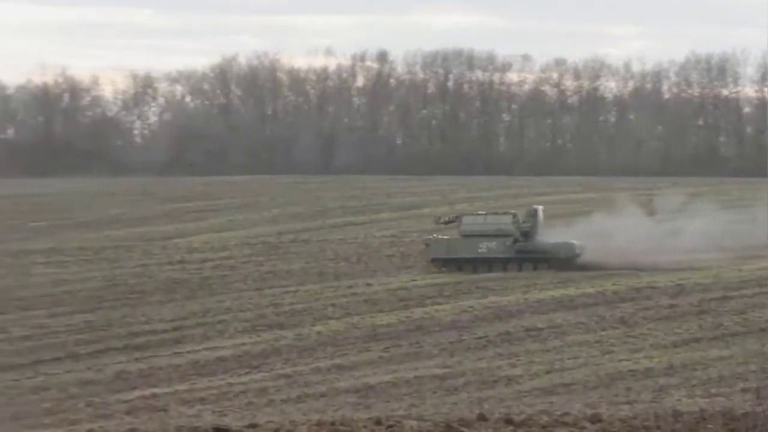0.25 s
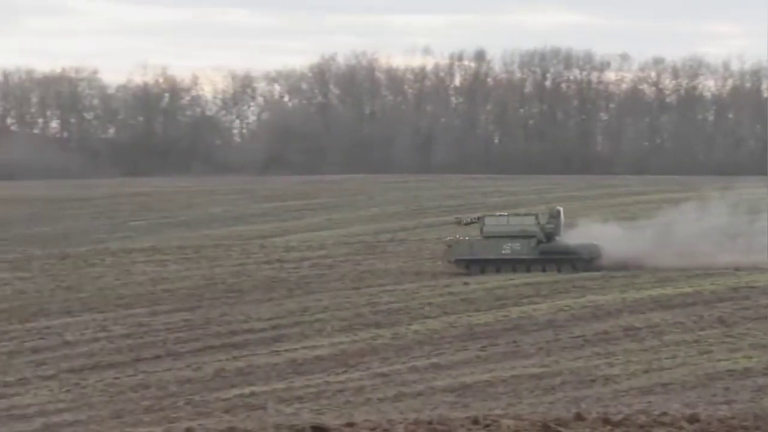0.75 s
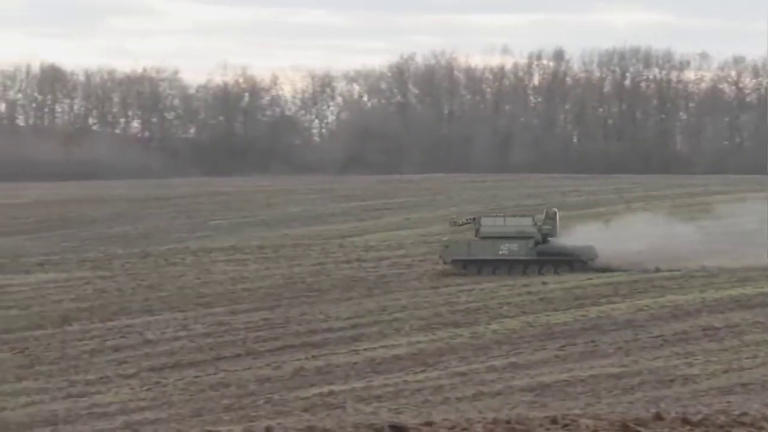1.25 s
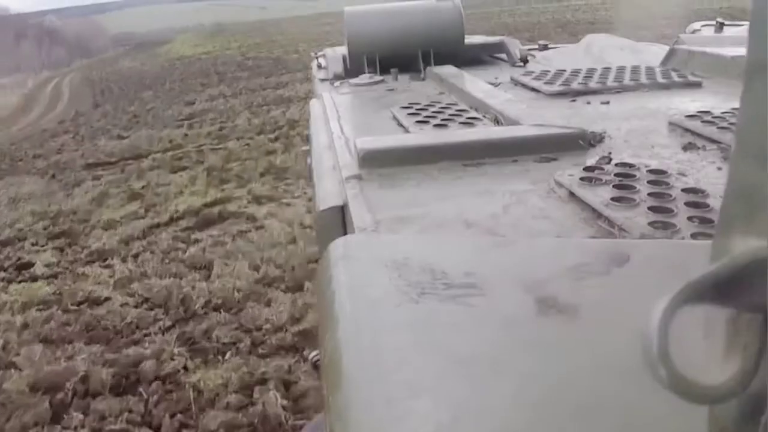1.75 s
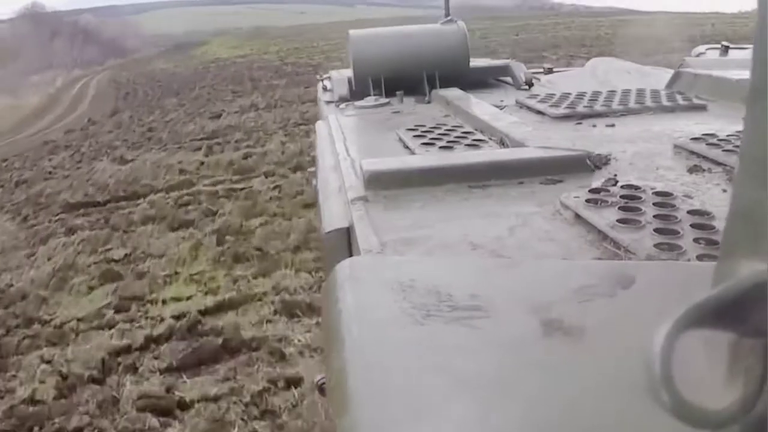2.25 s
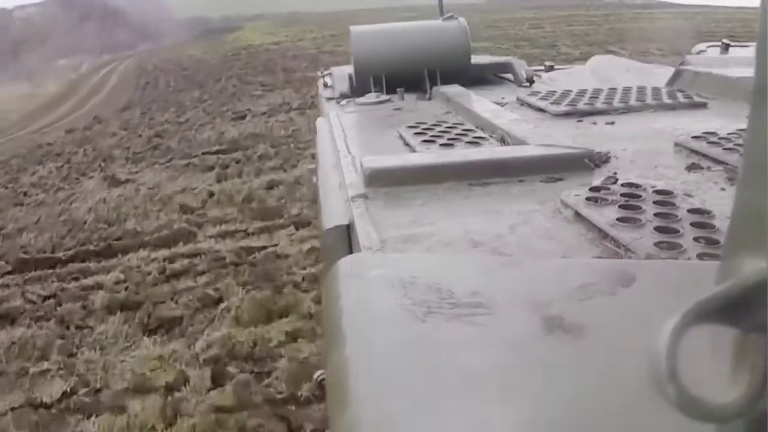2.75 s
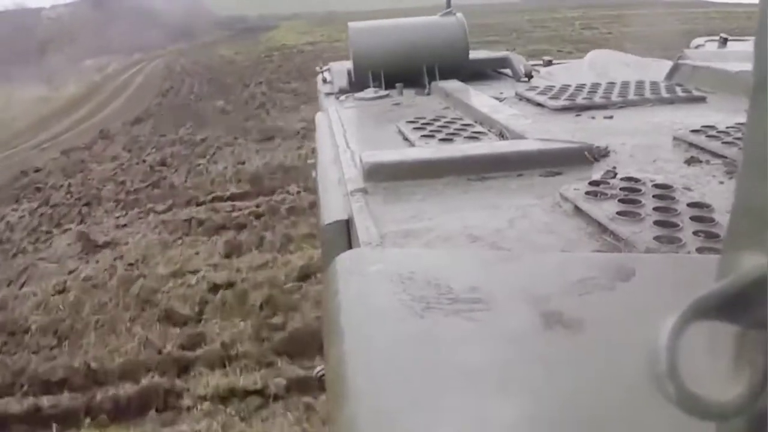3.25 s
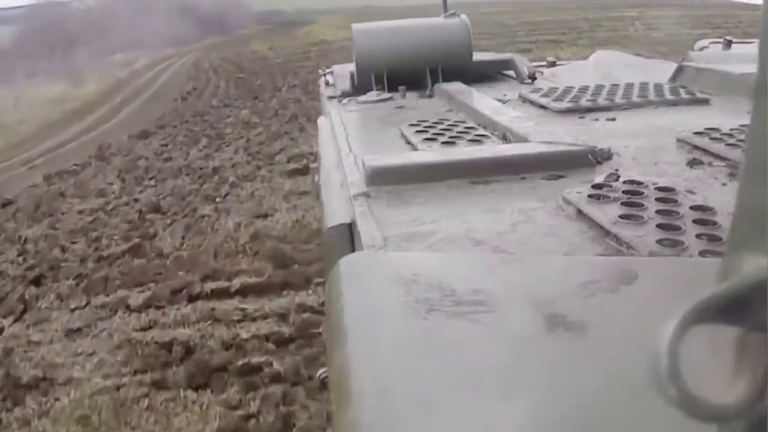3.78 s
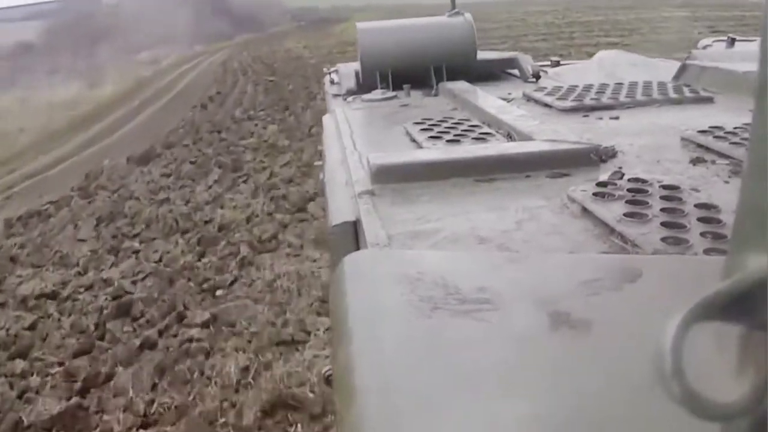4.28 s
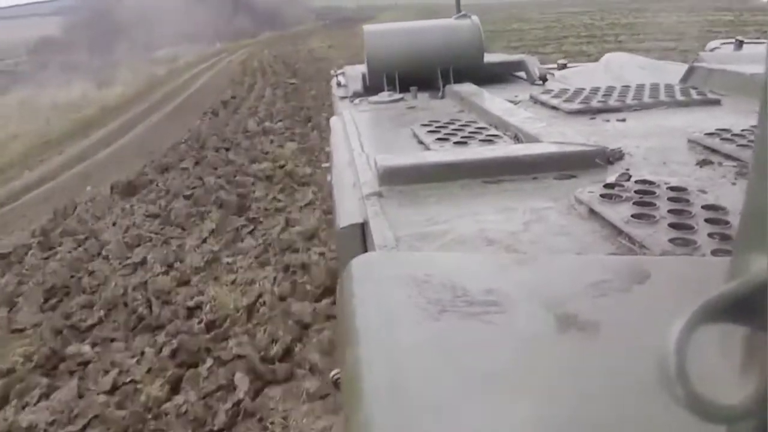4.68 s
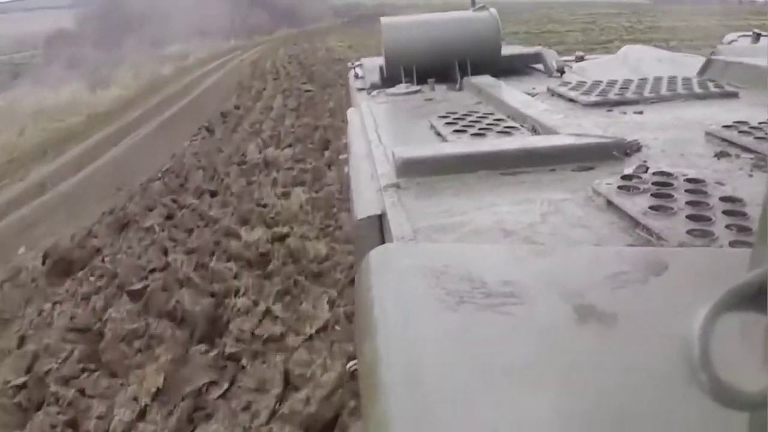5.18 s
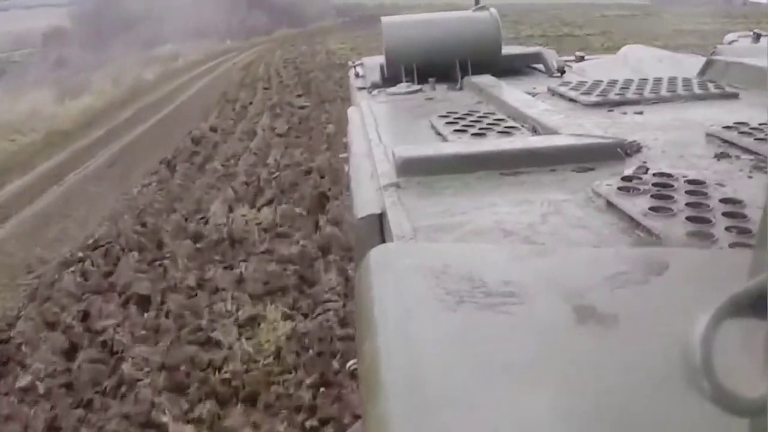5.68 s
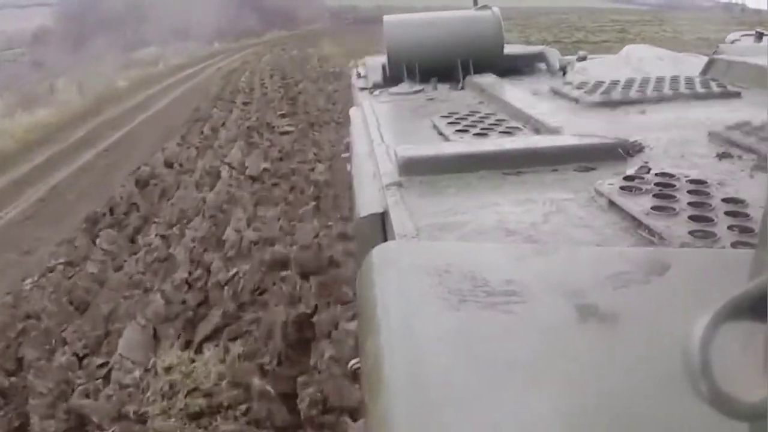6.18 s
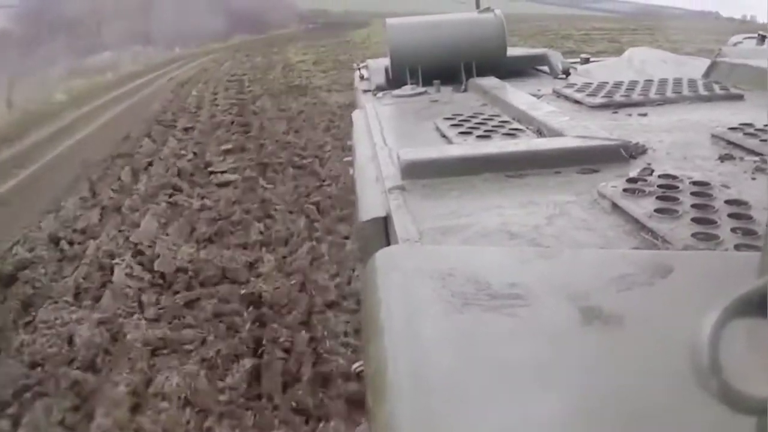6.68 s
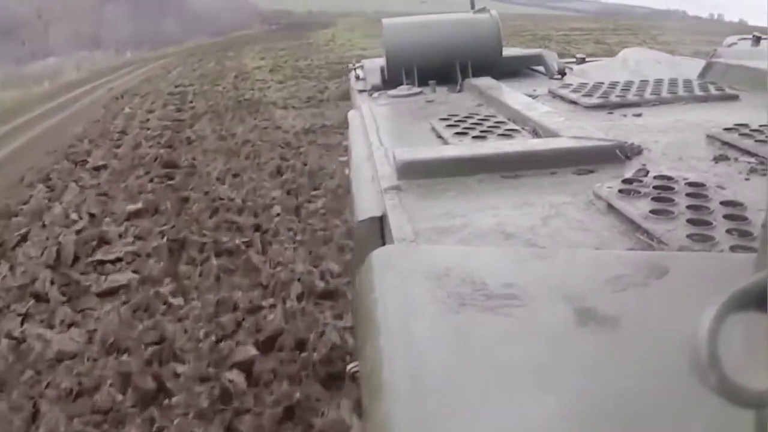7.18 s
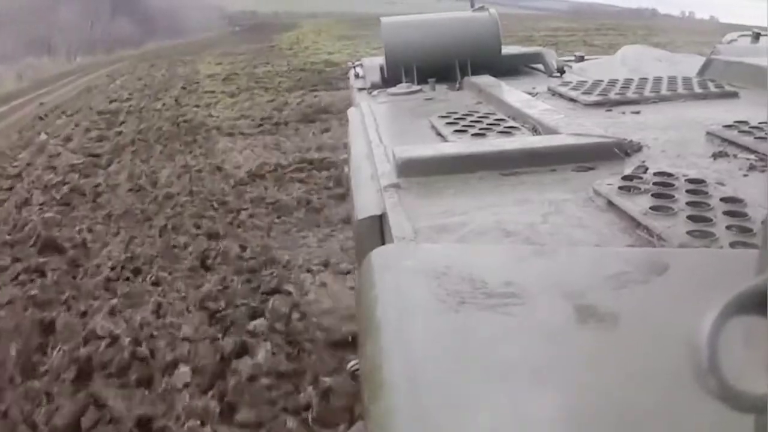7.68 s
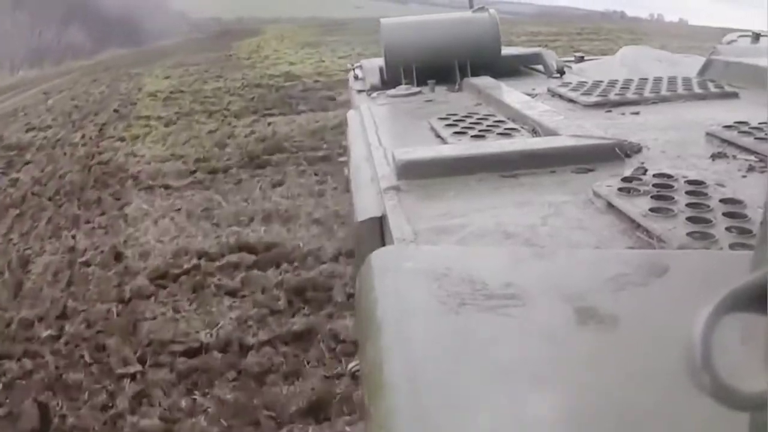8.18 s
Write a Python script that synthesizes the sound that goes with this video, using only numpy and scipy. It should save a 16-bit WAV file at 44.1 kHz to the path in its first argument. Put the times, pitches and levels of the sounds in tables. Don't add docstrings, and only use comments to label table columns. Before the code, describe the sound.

Buffeting wind and a dull distant tracked-vehicle rumble across a field, then an abrupt cut to loud onboard engine throb, rattling metal, knocks and ticks.

```python
import sys
import numpy as np
from scipy import signal
from scipy.fft import rfft, irfft
from scipy.io import wavfile
from scipy.ndimage import uniform_filter1d, minimum_filter1d

SR = 44100
rng = np.random.default_rng(int(sys.argv[2]) if len(sys.argv) > 2 else 0)


def transcribe(u):
    v = np.clip(np.atleast_2d(u).T, -1, 1)
    q = np.round(v * 32767).astype(np.int16)
    wavfile.write(sys.argv[1], SR, q)


def field_ratio(decibels):
    return 10 ** (np.asarray(decibels, dtype=float) / 20)


N = 372330

# f/Hz, level/dB per Hz
LOW_RATTLE = [(150, -29), (250, 5.5), (348, 0), (578, -3.5), (741, -6.5), (1040, -12), (1560, -11),
              (1820, -18.5), (2360, -15), (4200, -48.5), (5460, -53), (9240, -120)]
# f/Hz, level/dB per Hz
BRIGHT_RATTLE = [(2500, -10), (3600, 0), (4200, 0), (4600, 2), (5400, -1.5), (6200, -7.5), (7600, -6.5),
                 (8800, -12), (10000, -12), (13000, -9.5), (15500, -32.5)]
# t/s, peak level/dB, f/Hz
PIN_KNOCKS = [(1.784, -38.5, 1424), (2.223, -33, 1540), (2.346, -16, 1590), (2.385, -32, 1590),
              (2.877, -30.5, 1544), (2.912, -28, 1504), (2.968, -29.5, 1335), (2.986, -24, 1585),
              (4.113, -28.5, 1650), (4.366, -30, 1340), (4.435, -30, 1317), (4.524, -25.5, 1364),
              (4.569, -31, 1490), (4.693, -28, 1563), (5.121, -29, 1340), (5.19, -27.5, 1270),
              (5.404, -27.5, 1310), (5.501, -32, 1480), (5.611, -21.5, 1460), (5.746, -28.5, 1486),
              (5.856, -28.5, 1292), (5.891, -24.5, 1680), (5.93, -26, 1556), (6.209, -31, 1373),
              (6.281, -29, 1390), (6.958, -32.5, 1294), (7.375, -37, 1610), (7.75, -32, 1500),
              (7.921, -27, 2165), (7.931, -25.5, 2290)]
# t/s, peak level/dB
WHEEL_KNOCKS = [(1.684, -39.5), (1.817, -40), (1.901, -34), (2.083, -31.5), (2.424, -25.5), (2.528, -28.5),
                (2.675, -34.5), (3.087, -35), (3.242, -35.5), (3.332, -33), (3.574, -33.5), (3.783, -30.5),
                (3.833, -28.5), (4.472, -28.5), (4.841, -34.5), (4.924, -27), (5.044, -25), (5.082, -28.5),
                (5.346, -34.5), (5.801, -29.5), (6.133, -28), (6.338, -19.5), (6.571, -32.5), (6.722, -32),
                (7.151, -29), (7.296, -30.5), (7.684, -31), (8.254, -38.5), (8.321, -28.5), (8.392, -31.5)]
# t/s, peak level/dB, f/Hz
LINK_KNOCKS = [(2.034, -25, 440), (2.325, -22.5, 438), (2.445, -36, 380), (2.614, -32, 385),
               (2.734, -29.5, 412), (3.189, -23.5, 528), (4.346, -28, 428), (4.424, -29.5, 500),
               (4.615, -25, 425), (4.629, -23.5, 382), (4.674, -23.5, 530), (4.726, -22.5, 610),
               (4.855, -23, 404), (5.062, -26, 450), (5.153, -29, 444), (5.307, -27.5, 533),
               (5.573, -26.5, 487), (5.723, -28.5, 487), (5.984, -22, 402), (6.038, -27, 455),
               (6.097, -24, 470), (6.154, -28.5, 390), (6.189, -25.5, 433), (6.411, -28, 423),
               (6.463, -23, 608), (7.052, -30, 406), (7.09, -28, 595), (7.108, -30, 401),
               (7.204, -24.5, 493), (7.404, -27.5, 430), (7.424, -24, 505), (7.646, -32.5, 541),
               (7.947, -24, 401), (8.004, -28, 452), (8.113, -24, 490), (8.143, -23.5, 415),
               (8.214, -28, 382), (8.267, -24.5, 509), (8.347, -26, 734)]


def rms_one(x):
    return x / np.sqrt(np.mean(x ** 2) + 1e-20)


def hiss_noise():
    return rng.standard_normal(N)


def in_time(rows):
    s, *columns = np.transpose(rows)
    return [np.interp(np.arange(N) / SR, s, c) for c in columns]


def drift(rate):
    r = np.exp(-40 * np.pi * rate / SR)
    chance = rng.standard_normal(N // 20 + 2002)
    slow = signal.lfilter([1], [1, -2 * r, r * r], chance)[2000:]
    return np.interp(np.arange(N) / 20, np.arange(len(slow)), rms_one(slow))


def colour(x, spectrum):
    size = 2 ** 15
    hz, db = np.transpose(spectrum)
    bins_hz = np.arange(size // 2 + 1) * SR / size
    log_gain = np.interp(np.log(bins_hz + 1), np.log(hz), db) * np.log(10) / 20
    cepstrum = irfft(log_gain)
    cepstrum[1:size // 2] *= 2
    cepstrum[size // 2 + 1:] = 0
    response = irfft(np.exp(rfft(cepstrum)))
    return rms_one(signal.fftconvolve(x, response)[:N])


def resonance(x, hz, width_hz, count=1):
    r = np.exp(-np.pi * width_hz / SR)
    for _ in range(count):
        x = signal.lfilter([1, 0, -1], [1, -2 * r * np.cos(2 * np.pi * hz / SR), r * r], x)
    return rms_one(x)


def evened(x, hold_s):
    swell = uniform_filter1d(x ** 2, int(hold_s * SR))
    return rms_one(x / (swell + 0.013) ** 0.37)


def struck(s, level_db, hz, t60, rise_s):
    t = np.arange(int(.06 * SR)) / SR
    rise = (1 - np.exp(-t / rise_s)) ** 2
    return int(s * SR), field_ratio(level_db - 60 * t / t60) * np.sin(2 * np.pi * hz * t) * rise


def add(out, start, wave):
    out[start:start + len(wave)] += wave[:N - start]


def hump(s, before_s, after_s):
    t = np.arange(0, N + 64, 64) / SR - s
    return np.exp(-(t / np.where(t < 0, before_s, after_s)) ** 2)


def filled(coarse):
    return np.interp(np.arange(N) / 64, np.arange(len(coarse)), coarse)


def tone_gain(rest_db, swells):
    swelling = sum(field_ratio(2 * db) * hump(s, .5 * long_s, .5 * long_s) for s, db, long_s in swells)
    return filled(np.sqrt(field_ratio(2 * rest_db) + swelling))


def far_pass():
    # t/s, wind level/dB, rumble level/dB
    far_levels = [(0.0, -44.5, -24.5), (0.072, -32.5, -26.5), (0.416, -30.5, -39), (0.536, -34, -37),
                  (0.6, -25, -32), (0.692, -36.5, -40), (0.92, -34.5, -31.5), (1.44, -36, -33.5),
                  (1.66, -29, -30.5)]
    # t/s, level/dB
    far_tracks = [(0, -66.5), (.4, -65.5), (.8, -62.5), (1.2, -60), (1.66, -61.5)]
    # f/Hz, level/dB per Hz
    wind_spectrum = [(8, -14), (20, 8), (45, 10), (90, -6.5), (140, -4.5), (300, -78.5)]
    # f/Hz, level/dB per Hz
    rumble_spectrum = [(53, -11.5), (90, 0.5), (97, -4), (160, -6), (262, -17), (294, -18), (315, -24),
                       (412, -27.5), (900, -50), (1170, -81.5), (1980, -120)]
    # f/Hz, level/dB per Hz
    hiss_spectrum = [(350, -17), (600, 0.5), (1000, -3), (2000, -5), (3000, -11), (4000, -16.5),
                     (5000, -27.5), (6500, -34), (11800, -35), (12200, -59), (15000, -59)]
    # f/Hz, width/Hz, level/dB
    exhaust_modes = [(73, 4.7, -46), (131.3, 14, -50.5), (159.1, 3.7, -53)]
    wind_db, rumble_db = in_time(far_levels)
    hiss_db, = in_time(far_tracks)
    wind = colour(hiss_noise(), wind_spectrum)
    rumble = colour(hiss_noise(), rumble_spectrum) * field_ratio(3 * drift(6))
    low, *hum = [field_ratio(db + 35.0) * resonance(hiss_noise(), hz, w, count=2) for hz, w, db in exhaust_modes]
    hiss = colour(hiss_noise(), hiss_spectrum) * field_ratio(1.7 * drift(24))
    out = field_ratio(wind_db) * evened(wind + low, 0.037)
    out += field_ratio(rumble_db) * evened(rumble + sum(hum), 0.091)
    out += field_ratio(hiss_db) * hiss
    return out - .06 * np.exp(-np.arange(N) / SR / .0027)


def firing_phase():
    # t/s, f/Hz
    firing = [(1.67, 55.5), (3.2, 56), (4.2, 53.8), (5.7, 54.3), (7.4, 54.6), (8.44, 54.5)]
    firing_hz, = in_time(firing)
    return 2 * np.pi * np.cumsum(firing_hz * (1 + 0.012 * drift(4.1))) / SR


def hull(phase):
    # f/Hz, level/dB per Hz
    jolts = [(8.8, -64), (15, -15.5), (59, 0.5), (131, -1), (178, 6), (271, -21), (356, -29), (616, -48.5),
             (700, -35.5), (910, -61.5), (1540, -120)]
    # t/s, lower f/Hz, upper f/Hz
    shaft_speeds = [(1.67, 105.8, 155.4), (1.97, 102.9, 165.6), (3.23, 101.9, 156.6), (3.52, 108.9, 161.2),
                    (3.65, 98.76, 165.9), (3.97, 100.1, 151.8), (4.16, 108, 158.4), (5.14, 101, 160.3),
                    (5.78, 112.5, 162.8), (6.08, 97.5, 161.5), (6.29, 106.7, 170.1), (6.67, 101, 156.0),
                    (7.27, 108.1, 158.7), (7.7, 96.73, 164.3), (8.12, 107, 157.5), (8.44, 96, 156.3)]
    # f/Hz, width/Hz, share that is a clean tone
    hull_modes = [
        (56, 7.9, 0.89),
        (104.2, 21, 0.62),
        (159.6, 9, 0.9),
    ]
    rest_levels = (-31.5, -30, -31)
    # t/s, peak level/dB, length/s
    firing_swells = [(1.8, -27, 0.092), (2.3, -26.5, 0.34), (2.95, -25, 0.41), (3.45, -25.5, 0.071),
                     (3.85, -23, 0.12), (4.07, -26, 0.23), (4.45, -34.5, 0.26), (5.07, -25.5, 0.096),
                     (5.3, -26.5, 0.07), (5.82, -23, 0.2), (6.17, -22.5, 0.093), (6.5, -23.5, 0.26),
                     (6.9, -22, 0.077), (7.25, -24, 0.28), (7.85, -30.5, .2), (8.3, -24, 0.31)]
    # t/s, peak level/dB, length/s
    lower_swells = [(1.77, -24, 0.097), (2.2, -26, 0.38), (2.729, -24.5, 0.046), (3.23, -29.5, 0.14),
                    (3.75, -27.5, 0.37), (4.02, -25, 0.089), (4.63, -22.5, .2), (5.17, -30, 0.069),
                    (5.94, -22, 0.071), (6.2, -21.5, 0.18), (6.719, -25.5, 0.27), (7.2, -27.5, .4),
                    (7.6, -26, 0.17), (7.902, -25, 0.17), (8.15, -26.5, 0.13)]
    # t/s, peak level/dB, length/s
    upper_swells = [(1.749, -35.5, 0.27), (2.452, -26, 0.29), (2.949, -26.5, 0.11), (3.549, -21.5, 0.077),
                    (4.403, -26, 0.09), (4.9, -28, 0.1), (5.252, -27.5, .4), (5.68, -24, 0.23),
                    (6.198, -29.5, 0.25), (6.951, -27.5, 0.05), (7.35, -31.5, 0.17), (7.6, -30.5, 0.18),
                    (7.95, -30.5, 0.28), (8.349, -24, 0.13)]
    # f/Hz, width/Hz, level/dB
    side_modes = [
        (76.7, 15.6, -30),
        (130.2, 9, -32),
        (213.2, 35, -40.5),
    ]
    # t/s, peak level/dB, length/s
    side_swells = [(2.395, -28, .12), (2.857, -36, .15), (3.295, -29.5, 0.27), (3.809, -24, 0.098),
                   (4.25, -29.5, .12), (4.916, -27.5, 0.085), (5.325, -31.5, 0.17), (5.742, -28.5, 0.5),
                   (6.45, -37, .15), (7.046, -32, .15), (7.452, -33.5, 0.09), (8.112, -31, 0.31)]
    # f/Hz, width/Hz, level/dB
    gear_whine = (729, 32, -58)
    out = field_ratio(-29.5) * evened(colour(hiss_noise(), jolts), 0.019)
    shafts = [2 * np.pi * np.cumsum(hz * (1 + 0.01191 * drift(5.02))) / SR for hz in in_time(shaft_speeds)]
    gains = map(tone_gain, rest_levels, (firing_swells, lower_swells, upper_swells))
    for angle, gain, (hz, w, clean) in zip([phase] + shafts, gains, hull_modes):
        ringing = evened(resonance(hiss_noise(), hz, 2.0 * w, count=2), 0.025) * field_ratio(3 * drift(10))
        out += gain * (np.sqrt(2 * clean) * np.cos(angle) + np.sqrt(1 - clean) * ringing)
    for i, (hz, w, db) in enumerate(side_modes):
        gain = tone_gain(db, side_swells) if i == 1 else field_ratio(db)
        out += gain * evened(resonance(hiss_noise(), hz, 1.23 * w, count=2), 0.063)
    hz, w, db = gear_whine
    whine = evened(resonance(hiss_noise(), hz, w, count=2), 0.12)
    return out + field_ratio(db + 2.9 * drift(10.0)) * whine


def shaking():
    # t/s, level/dB
    ground = [(1.67, -45.5), (2.4, -44.5), (3.0, -39.5), (3.5, -45.5), (3.9, -40.5), (4.3, -45.5),
              (4.8, -43), (5.4, -42.5), (5.8, -40.5), (6.3, -41), (6.9, -45), (7.3, -44), (7.7, -44),
              (8.44, -46)]
    # landing t/s, depth/dB, fade/s
    lulls = [(1.731, 17.5, 0.035), (1.887, 7.5, 0.02), (1.972, 6, 0.059), (2.2, 5.5, 0.065),
             (2.491, 6.5, 0.16), (2.85, 7.5, 0.017), (3.159, 7, 0.042), (3.41, 3.5, 0.076),
             (3.73, 7.5, 0.062), (4.009, 6, 0.014), (4.34, 5, 0.02), (4.992, 11.5, 0.039),
             (5.54, 10, 0.092), (6.12, 10.5, 0.031), (6.77, 14.5, 0.016), (7.05, 7.5, 0.053),
             (7.33, 5, 0.023), (7.602, 10, .07), (7.72, 3, 0.034), (7.828, 11, 0.18), (8.088, 11.5, 0.048)]
    # t/s, rise/dB, extra brightness/dB
    bumps = [(1.7, 9.5, 5.5), (1.819, 6, 3.5), (2.09, 4, 1), (2.23, 2, 2), (2.37, 13.5, -1),
             (2.81, 1.5, -2), (2.9, 1.5, 3), (3.21, 4.5, 0.5), (3.63, 2.5, 0.5), (4.06, 3, 7.5),
             (4.93, 7, -5.5), (5.072, 1, 6), (5.702, 5.5, -2.5), (6.041, 0, 6.5), (6.219, 7, 0.5),
             (6.39, 1.5, 3), (7.11, -0.5, 5.5), (7.289, 4.5, -1), (7.36, 4, 3.5), (7.68, 4.5, 3),
             (7.757, 8.5, 6.5), (7.932, 5, 3.5), (8.037, 6.5, 3.5), (8.27, 2.5, -2.5)]
    landing_s, bump_s = 0.016, 0.048
    ground_db, = in_time(ground)
    lull_db = sum(db * hump(s, fade_s, landing_s) for s, db, fade_s in lulls)
    all_knocks = PIN_KNOCKS + WHEEL_KNOCKS + LINK_KNOCKS
    lull_db += sum(3 * hump(s - .002, .008, 0.0033) for s, *_ in all_knocks)
    bump_db = sum(db * hump(s, 0.55 * bump_s, bump_s) for s, db, _ in bumps)
    extra_db = sum(db * hump(s, 0.55 * bump_s, bump_s) for s, _, db in bumps)
    low_db = ground_db + filled(bump_db - lull_db)
    bright_db = low_db - 14 + 0.37 * (low_db - np.mean(low_db)) + filled(extra_db)
    return low_db, bright_db


def rattle(shake, phase):
    # f/Hz, width/Hz, level/dB
    mount_modes = [(733, 20, -16), (1570, 230, -8), (2550, 1890, -22), (315.2, 34, -12.5)]
    # f/Hz, width/Hz, level/dB
    metal_buzz = [(4600, 240, -10), (5100, 160, -10), (5350, 110, -11), (2720, 60, -12)]
    # from t/s, f/Hz, width/Hz, level/dB
    loose_plate = (7.92, 2290, 360, -12.5)
    low_db, bright_db = shaking()
    swing = np.abs(np.roll(rms_one(shake), 60) - .25)
    firing_db = 3.2 * np.cos(phase - .7)
    gate = field_ratio(1.4 * swing + firing_db + 4.7 * drift(12.9) + 1.78 * drift(99))
    sizes = field_ratio(0.91 * np.minimum(rng.exponential(1, N), 5)) * rng.choice([-1, 1], N)
    single_hits = rms_one(sizes * (rng.random(N) < 1500 / SR))
    contacts = evened((single_hits + 0.86 * hiss_noise()) * gate, 0.044)

    low = colour(contacts, LOW_RATTLE)
    low += sum(field_ratio(db + 2.0 * drift(7)) * resonance(contacts, hz, w, count=2) for hz, w, db in mount_modes)
    loose_s, hz, w, db = loose_plate
    is_loose = np.arange(N) > loose_s * SR
    low += field_ratio(db + 3.5 * drift(20)) * resonance(contacts, hz, w, count=2) * is_loose
    upper = signal.sosfilt(signal.butter(3, 1900, "high", fs=SR, output="sos"), low)
    low += upper * (field_ratio(2 * drift(12)) - 1)

    metal_gate = field_ratio(2.7 * drift(23) - 0.3 * firing_db + 2.8 * drift(100))
    hard = evened(contacts * metal_gate, 0.075)
    bright = colour(hard, BRIGHT_RATTLE)
    bright += sum(field_ratio(db) * resonance(hard, hz, w) for hz, w, db in metal_buzz)
    fringe = signal.sosfilt(signal.butter(4, 6300, "high", fs=SR, output="sos"), bright)
    bright += fringe * (field_ratio(6.55 * np.minimum(drift(26), 1.3) + 3.0) - 1)
    return field_ratio(low_db + 3.0) * rms_one(low) + field_ratio(bright_db - 1.5) * bright


def knocks(phase):
    out, snaps, puffs, t = np.zeros(N), np.zeros(N), np.zeros(N), np.arange(1500) / SR
    swell = (t / .003 * np.exp(1 - t / .003)) ** 2
    shove = -(t / 0.00099) ** 2 * np.exp(-t / 0.0017) * np.cos(2 * np.pi * 130 * t)
    drops = [(s, db - 8.5, hz) for s, db, hz in LINK_KNOCKS]
    wheels = [(s, db, 1090 * (1 + 0.028 * rng.normal())) for s, db in WHEEL_KNOCKS]
    for (s, db, hz), noise in zip(PIN_KNOCKS + wheels + drops, rng.standard_normal((120, 1500))):
        add(out, *struck(s, db - 8, hz, t60=.018, rise_s=0.0015))
        add(out, int(s * SR), field_ratio(db + 13) * shove)
        add(puffs, int(s * SR), field_ratio(db) * swell * noise)
        snaps[int((s + .002) * SR)] = -field_ratio(db + 27.5)
    firings = np.diff((phase - .7) // (2 * np.pi), prepend=-1)
    jerked = firings * (rng.random(N) < .55)
    snaps -= jerked * field_ratio(shaking()[0] + 29 + 3 * hiss_noise())
    snap_band = signal.butter(3, [260, 1800], "band", fs=SR, output="sos")
    out += signal.sosfiltfilt(snap_band, snaps + 1e-18)
    puff = field_ratio(-5.0) * colour(puffs, LOW_RATTLE) + field_ratio(-21.5) * colour(puffs, BRIGHT_RATTLE)
    return out + np.std(puffs) * puff


def ticks(phase):
    # t/s, peak level/dB, upper mode relative level/dB, top mode relative level/dB
    main_ticks = [(1.8132, -72, -10, 3), (2.113, -32, -8, -4.5), (2.232, -38, -6, -28),
                  (2.338, -30.5, -6, -8), (2.5588, -44.5, 4, 2), (2.765, -36, -1, -4),
                  (2.7848, -47, 15, -20), (3.218, -41, 7, -2), (3.648, -42, -2, -4),
                  (3.8632, -31.5, -10, -18), (3.885, -32, -5, -7), (3.903, -43, 9, -4),
                  (4.051, -33.5, 6, 0), (4.076, -35, -1, -18), (4.486, -38.5, -3, -26),
                  (4.5363, -31, -4.5, -11), (4.939, -41, 4, -24), (5.4802, -38.5, 0, -22),
                  (5.6907, -35, 2, 0), (6.0314, -43, 15, 4), (6.182, -23.5, -11.5, -24),
                  (6.227, -32, 3, -3), (6.2674, -34.5, 3, -18), (6.3998, -26.5, 2.5, -26),
                  (6.458, -27.5, 2, -26), (6.6222, -33.5, -7, -15), (6.676, -31.5, -4.5, -12),
                  (7.1813, -32.5, -8, -11), (7.348, -30, -17, -9), (8.2963, -34.5, -8, -17)]
    # t/s, peak level/dB, upper mode relative level/dB
    light_ticks = [(2.3245, -34.5, -0.5), (2.3677, -44, -2), (2.492, -40, -3), (2.5157, -34, -8),
                   (2.5376, -43, -1.5), (2.5698, -39, 0.5), (2.5894, -40, -6), (2.6445, -43, -6),
                   (2.6564, -48, -2), (2.7048, -45, -2), (2.817, -38, 3), (2.9257, -41, -3),
                   (2.9733, -35, 1), (3.0084, -40.5, 4), (3.151, -42, -10), (3.1762, -43, -2),
                   (3.6159, -52, -12), (3.803, -34, 1), (3.8258, -35, 0), (3.9905, -34, -2),
                   (4.3144, -47, 3), (4.4383, -50, -2), (4.6692, -36.5, 0), (4.6844, -49, -5),
                   (4.7324, -48, -2), (4.7556, -44, -4), (4.8474, -45, -5), (4.8755, -50, -2),
                   (4.9235, -37, -5.5), (5.0948, -42.5, 3), (5.1834, -39, 1), (5.2631, -44.5, 1),
                   (5.469, -44.5, -1), (5.7675, -36, 0), (5.8089, -38, 1), (5.8852, -40, 1),
                   (6.049, -41.5, -1.5), (6.073, -38, -2), (6.201, -30.5, 1), (6.2927, -35, -2),
                   (6.3452, -42, 5), (6.3808, -32, 0), (6.419, -34.5, -2), (6.5705, -37, -1),
                   (6.781, -44, -2), (7.0785, -45, -4), (7.2876, -34.5, -3.5), (7.3787, -42.5, -2),
                   (7.921, -40, 1), (8.0314, -40, -14), (8.2164, -42, -2), (8.2407, -45.5, -2)]
    # f/Hz, t60/s
    latch_modes = [
        (4590, 0.015),
        (5350, 0.015),
        (7500, 0.012),
    ]
    firings = np.flatnonzero(np.diff(phase // (2 * np.pi)))
    luck, spread = rng.random(600), rng.normal(0, 1, (600, 3))
    low_db = shaking()[0]
    faint = [(i / SR, low_db[i] - 6 + 3 * p, -8 + 6 * q, -14 + 7 * r)
             for i, chance, (p, q, r) in zip(firings, luck, spread) if chance < 0.1]
    nudges = [(s, db - 1, upper_db, -13.5) for s, db, upper_db in light_ticks]
    out, off_pitch = np.zeros(N), rng.normal(0, .01, (200, 3))
    for (s, db, upper_db, top_db), detune in zip(main_ticks + nudges + faint, off_pitch):
        for (hz, t60), rel_db, shift in zip(latch_modes, (0, upper_db, top_db), detune):
            add(out, *struck(s, db + rel_db + 7.5, hz * (1 + shift), t60, rise_s=0.0017))
    return out * (1 + .6 * drift(500))


def spits():
    # t/s, peak level/dB
    sizzles = [(2.3685, -61), (2.6269, -77), (2.7202, -72), (2.7636, -75), (2.806, -67), (2.877, -69),
               (4.924, -69), (5.6907, -61.5), (6.0314, -63), (6.2328, -60), (7.9302, -60.5), (8.1119, -85)]
    out, swell = np.zeros(N), np.hanning(1500)
    for (s, db), noise in zip(sizzles, rng.standard_normal((len(sizzles), 1500))):
        add(out, int(s * SR) - 500, field_ratio(db - 1.5) * swell * noise)
    return signal.sosfilt(signal.butter(6, [11500, 14500], "band", fs=SR, output="sos"), out + 1e-18)


def in_housing(near):
    near = near - .45 * signal.lfilter(*signal.iirpeak(4130, 12, fs=SR), near)
    return signal.sosfilt(signal.butter(8, 8460, fs=SR, output="sos"), near)


def scene():
    change_s = 1.6702
    phase = firing_phase()
    shake = hull(phase)
    near = shake + rattle(shake, phase) + knocks(phase) + ticks(phase)
    near = in_housing(near) + spits()
    since = np.arange(N) / SR - change_s
    near *= np.clip(since / .003, 0, 1) * np.clip((since[-1] - since) / .004, 0, 1)
    far = far_pass() * np.clip(-since / .002, 0, 1)
    jump = 0.018 * (since >= 0) * np.exp(-np.abs(since) / .002)
    return (far + near + jump)[None]


def low_pass(x):
    return signal.sosfilt(signal.butter(12, 15000, fs=SR, output="sos"), x)


def record(dry):
    peak = -minimum_filter1d(-np.abs(dry), size=700)
    gain = uniform_filter1d(np.minimum(1, 0.38 / (peak + 1e-9)), size=500)
    rounded = 0.43 * np.tanh((dry * gain - .01) / 0.42)
    return low_pass(rounded - np.mean(rounded))


dry = scene()
out = record(dry)
transcribe(out)
```